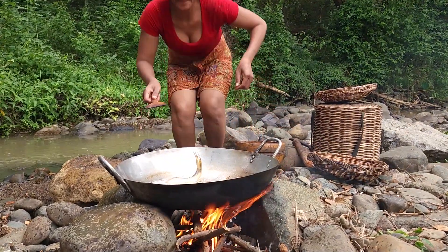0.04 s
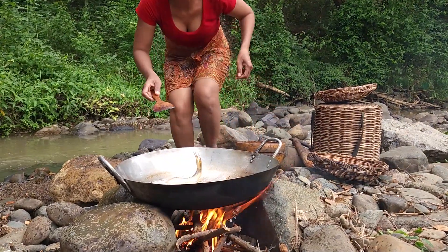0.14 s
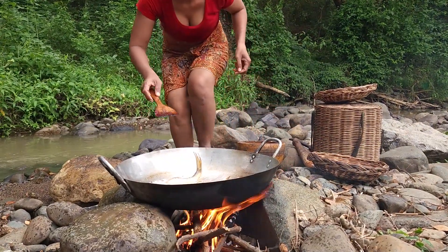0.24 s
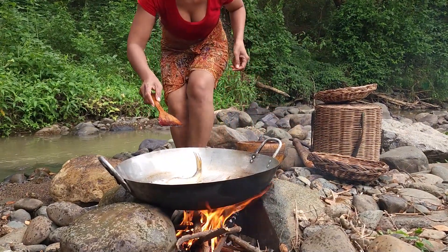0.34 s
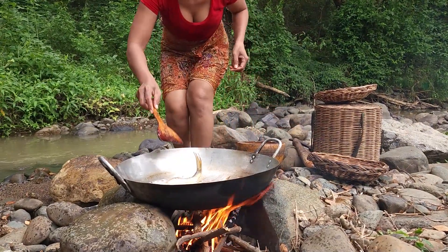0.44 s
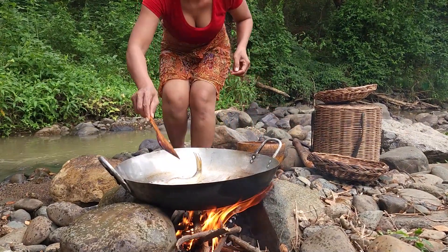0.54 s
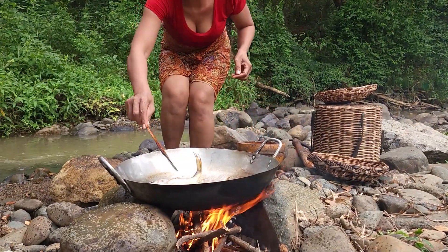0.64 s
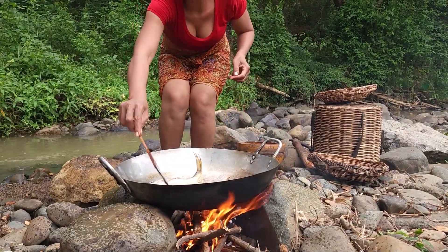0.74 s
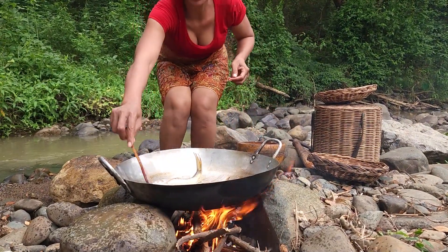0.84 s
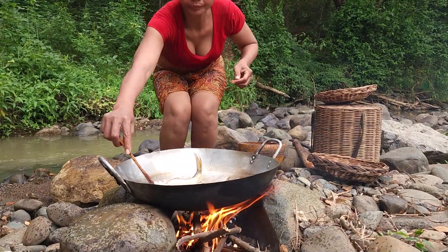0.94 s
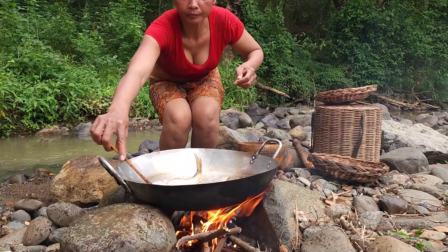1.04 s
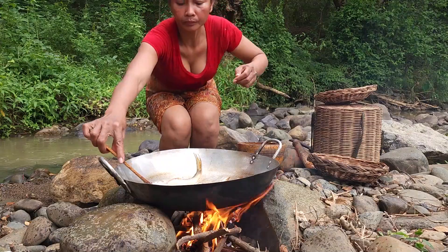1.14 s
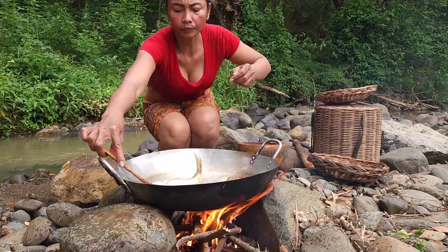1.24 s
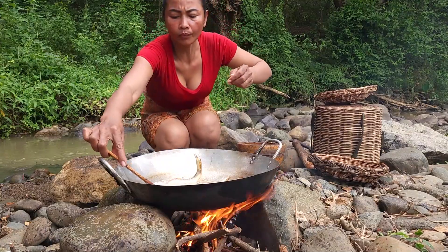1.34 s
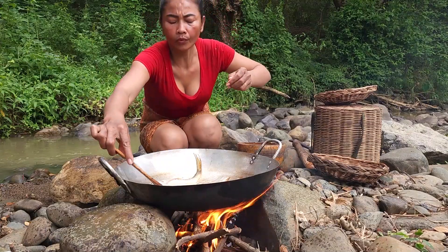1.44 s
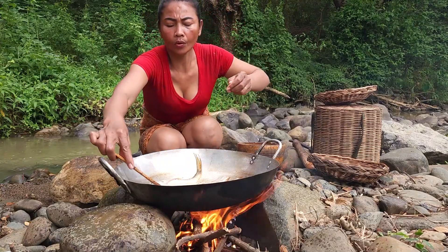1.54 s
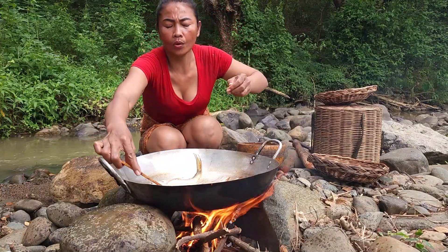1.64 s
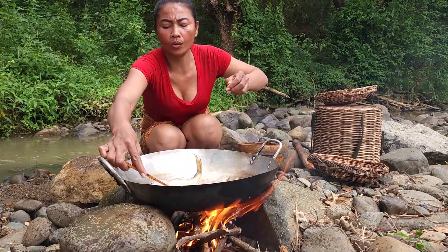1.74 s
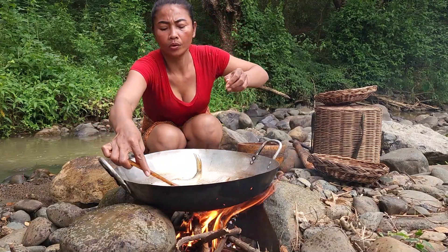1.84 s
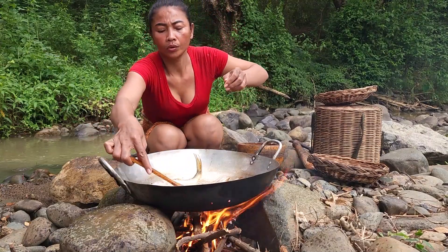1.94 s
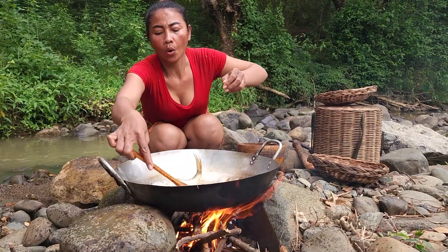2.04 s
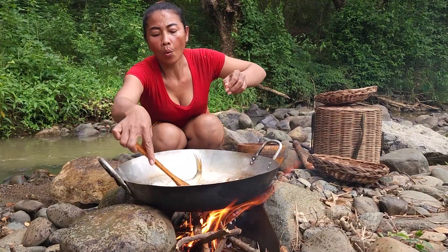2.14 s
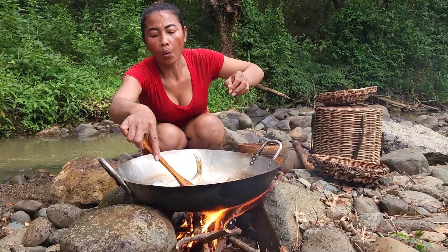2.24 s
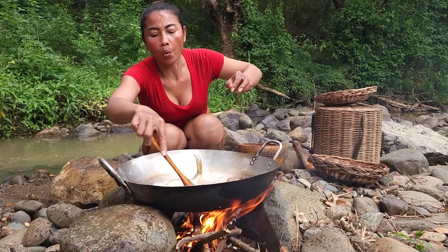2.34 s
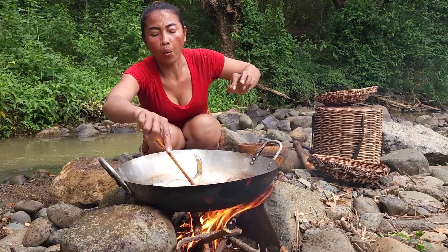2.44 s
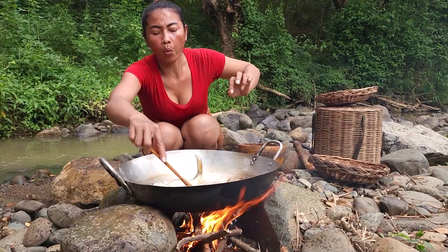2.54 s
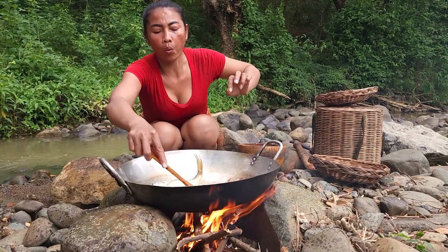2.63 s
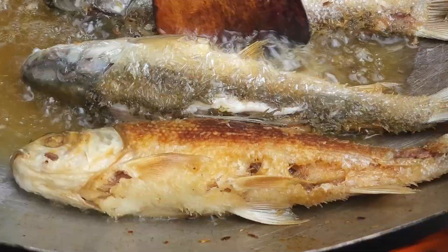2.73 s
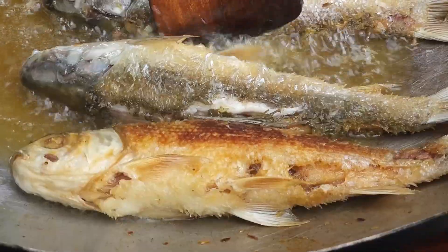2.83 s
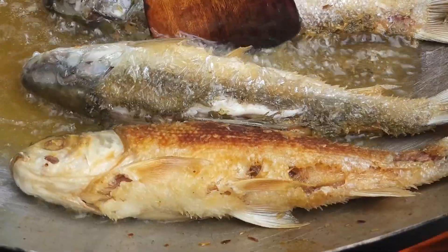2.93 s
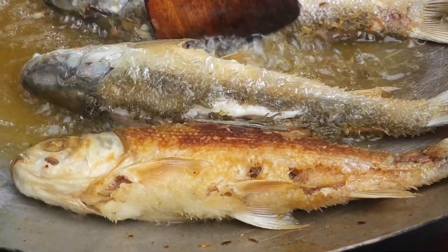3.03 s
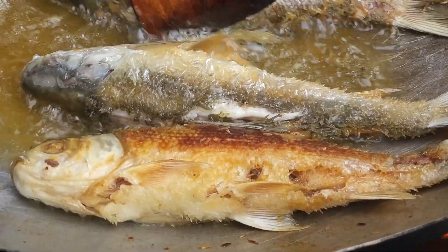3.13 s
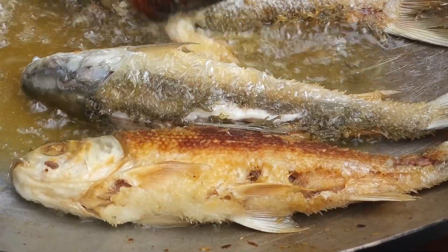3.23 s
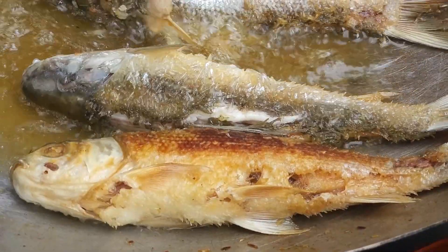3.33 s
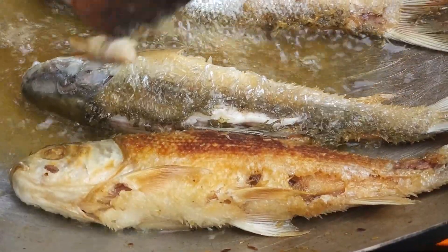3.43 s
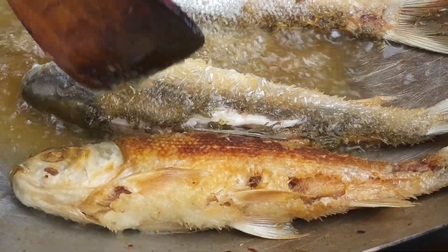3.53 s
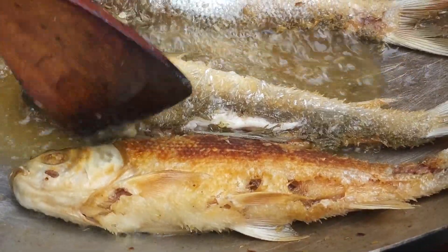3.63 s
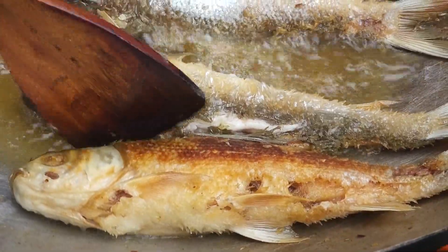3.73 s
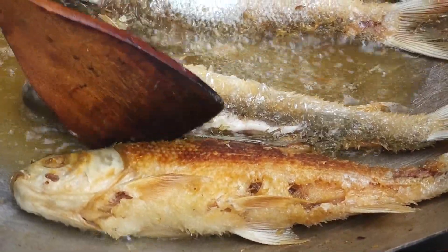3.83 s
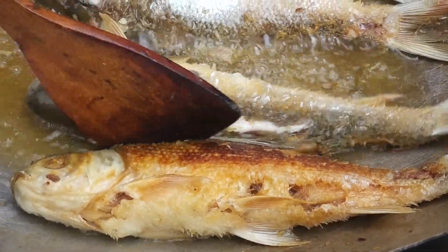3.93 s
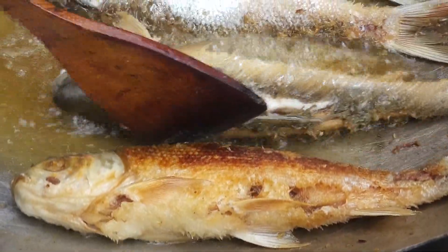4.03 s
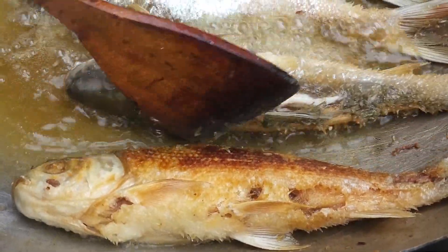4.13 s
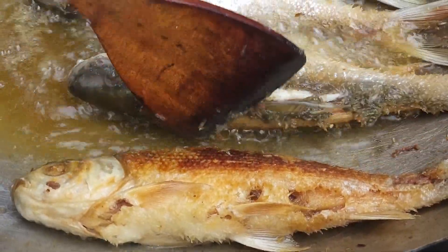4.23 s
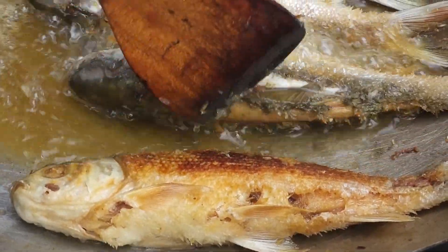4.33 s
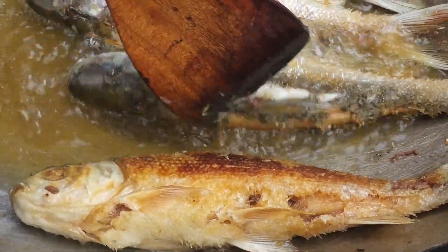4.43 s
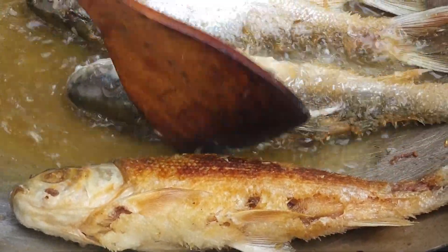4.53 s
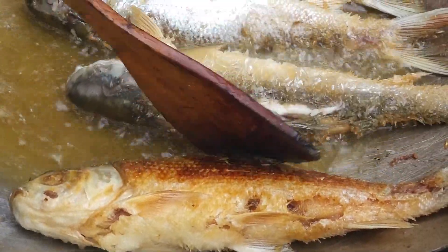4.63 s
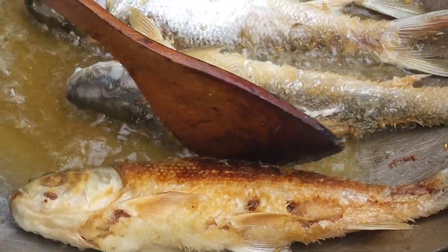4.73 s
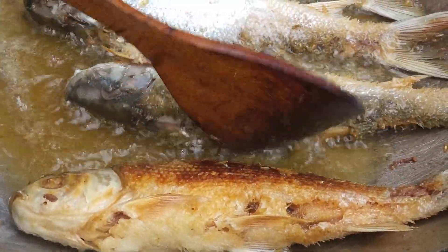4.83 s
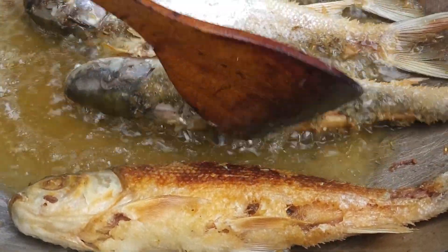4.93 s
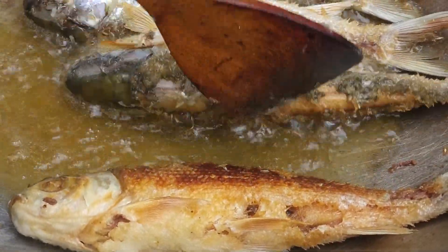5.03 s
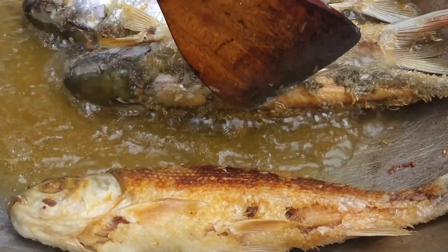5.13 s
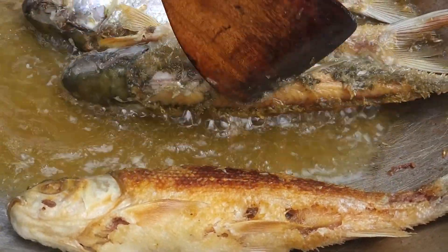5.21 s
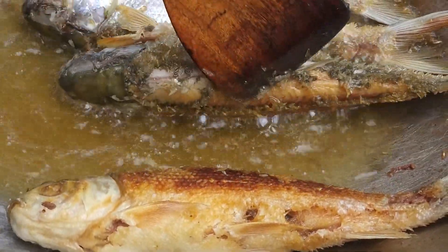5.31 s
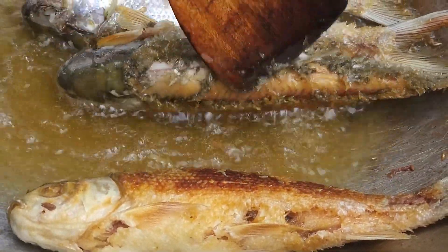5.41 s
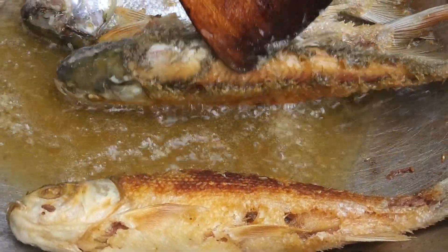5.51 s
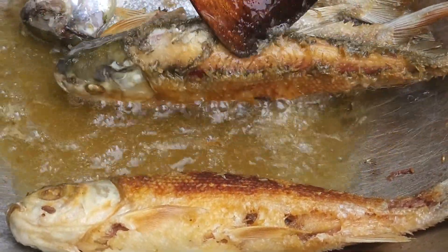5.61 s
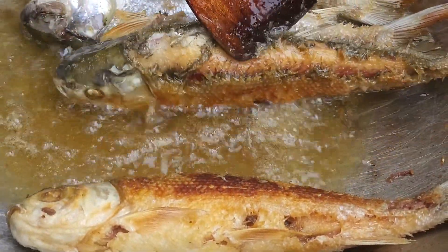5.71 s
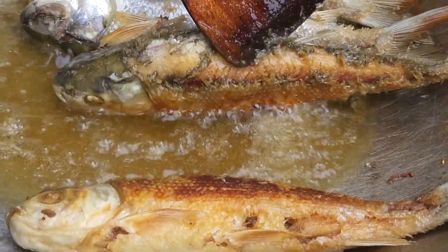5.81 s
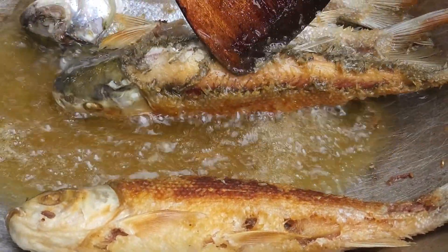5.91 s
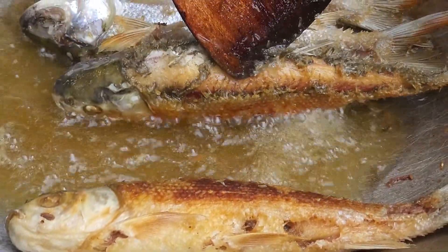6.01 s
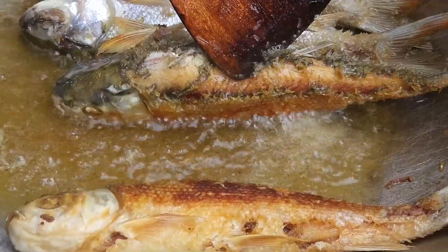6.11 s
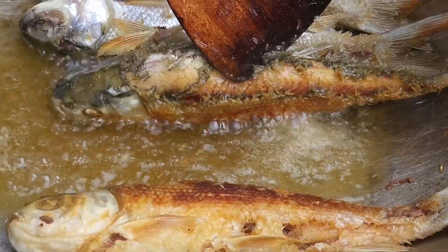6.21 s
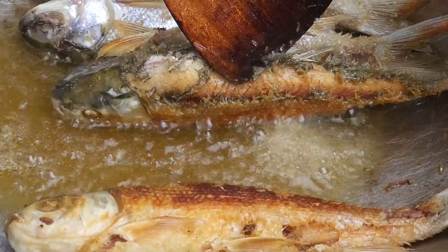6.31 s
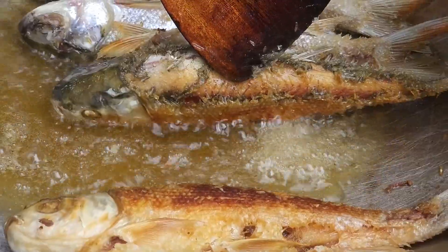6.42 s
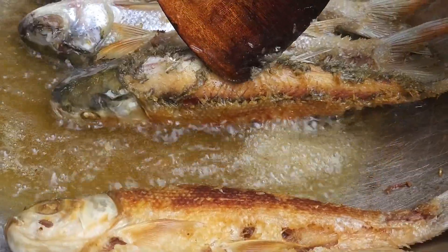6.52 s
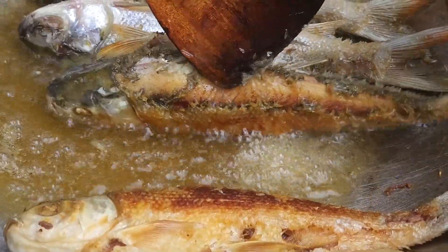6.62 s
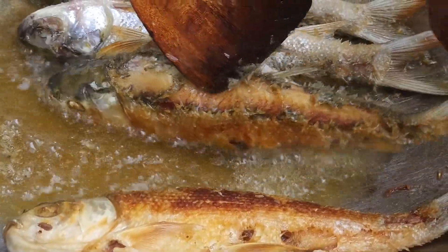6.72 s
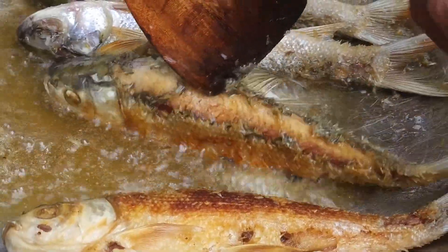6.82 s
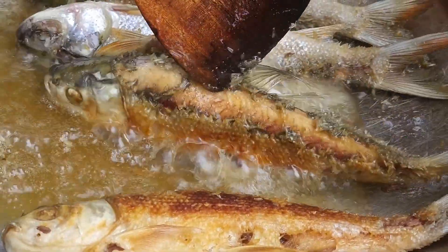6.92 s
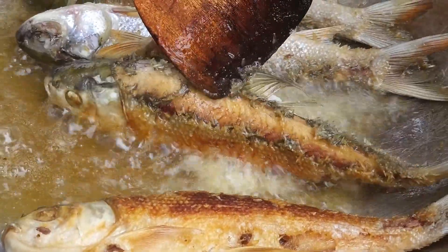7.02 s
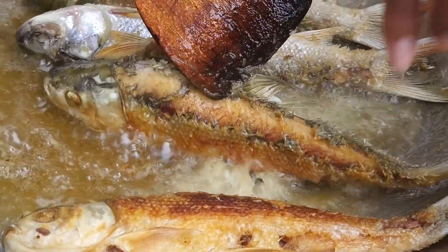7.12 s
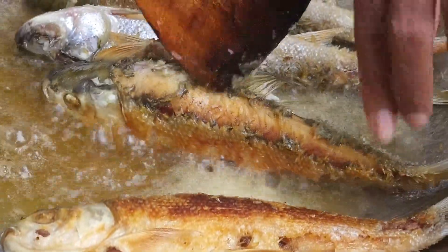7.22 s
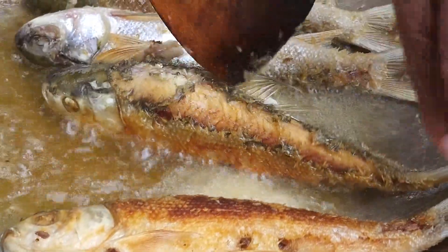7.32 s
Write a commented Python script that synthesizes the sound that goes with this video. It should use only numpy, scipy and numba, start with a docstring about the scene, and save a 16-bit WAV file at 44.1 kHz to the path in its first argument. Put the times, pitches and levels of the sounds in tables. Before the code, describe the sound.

Sparse crackles, one sharp wood crack and dull wok knocks from a few steps away cut abruptly to loud fish sizzling in hot oil.

```python
"""Fish fry in a steel wok over a wood fire outdoors, heard at two microphone ports.
Up to 2.812 s, from a few steps away: clumped steam bubbles, a low rustle and steady hiss as shaped noise.
From then on, from close above the oil: a dense fizz of bubble bursts, a hum of the wok and tiny snaps.
Throughout: spits as trails of damped sines, cracks of wood as noise splits with ringing splinters,
spatula knocks as damped steel modes, dull booms as sagging sines, and the fire's roar as fluttering noise."""
import sys
import numpy as np
from scipy.fft import rfft, irfft, next_fast_len
from scipy.io import wavfile
from scipy.ndimage import map_coordinates
from numba import njit

SR = 44100
rng = np.random.default_rng(int(sys.argv[2]) if len(sys.argv) > 2 else 0)


def int16_out(signal):
    """Quantize to a 16-bit WAV file."""
    q = np.round(np.clip(np.atleast_2d(signal).T, -1, 1) * 32767)
    wavfile.write(sys.argv[1], SR, q.astype(np.int16))


N = 324576
MOVE_S, MOVE_FADE_S = 2.812, 0.0057  # the listening point goes from far to close

# Fire roar spectrum. Each row: frequency in Hz, gain in dB.
ROAR_SPECTRUM = [(13, -39), (25, -15), (38, -4.5), (53, 8), (75, 1), (100, 4.5), (125, -2), (160, -2.5),
                 (200, -13.5), (300, -26), (400, -47), (660, -120)]
ROAR_FAR_DB, ROAR_NEAR_DB, ROAR_WAVERS_DB = -50, -58, 1

# Dull low booms. Each row: start in seconds, level in dB, settled pitch in Hz.
BOOM_EVENTS = [(0.15, -43, 54.6), (1.138, -44, 98), (1.778, -41, 52), (1.926, -41.5, 99.5),
               (2.138, -42.5, 99.7), (2.999, -42, 61), (3.58, -51, 56.4), (4.19, -45.5, 61.7),
               (4.94, -46, 59.6), (5.389, -43, 63), (5.57, -49, 40), (7.187, -42.5, 54), (7.332, -43, 61.5)]
BOOM_RISE_S, BOOM_T60_S = 0.0045, 0.45
BOOM_SAG, BOOM_SAG_S = 0.3, 0.017  # the pitch starts higher by this share and settles

# Spatula on the wok. Each row: start in seconds, blow in dB, brightness in dB, depth in dB.
KNOCK_EVENTS = [(.455, -37, 1, -14), (0.573, -57, 11, -14), (.674, -45, -1.5, -3), (0.911, -36, 1.5, -11),
                (1.046, -36, 1, -7.5), (1.074, -40, -22, -29), (1.237, -60.5, -9, 10.5),
                (1.356, -44.5, 0.5, -6), (1.428, -44.5, -14, -11), (1.548, -39.5, -22, -4),
                (1.745, -59, 9, -16), (1.778, -58, 6, -14), (1.984, -60, 3, -10), (2.136, -57.5, 12, -14),
                (2.338, -38.5, 1.5, -10), (2.475, -39, -3, -11), (2.904, -27.5, -30, -47),
                (3.046, -35, -4.5, -33), (4.624, -47.5, 3, -20), (4.721, -35, -28, -22),
                (5.459, -40, -8, -16), (6.715, -50, 13.5, -19)]
# Modes of the wok. Each row: frequency in Hz, level in dB, T60 in seconds.
WOK_MODES = [(274, 10.5, 0.031), (365, 0.5, 0.039), (452, -3, 0.036), (637, 4, 0.021), (792, -2, 0.028),
             (1100, -3.5, 0.04)]
SLIP_S, SLIP_DB, SLIP_FALL_DB = 0.063, -6.5, 11.5  # span of the blade's slips, level, loss over the span
CLOSE_SLIP_DB = -8  # deep in the oil the slips are damped

# Wood cracks and oil snaps. Each row: start in seconds, level in dB, left-right in dB, body in dB,
# middle in dB (body and middle against the top register).
CRACK_EVENTS = [(0.044, -24.5, -4, -25, 2), (0.0853, -23.5, 0, -18, 2), (.3646, -20, -2, -15, -7),
                (.394, -34, 0, 18, 3), (0.4465, -19.5, -5, 5, -2), (0.4576, -25, -4, 16, 13.5),
                (.4928, -26, -1, -4, 6), (.637, -31, -4, -2, 1), (.843, -27, -1, -5, 3),
                (0.932, -18.5, -1, 1.5, -5), (.9966, -17, -2, -8, 2), (1.069, -26.5, 1, 10, 8.5),
                (1.2386, -31, 3.5, -8, 4), (1.4297, 0.5, 2, 2, 3), (1.4914, -19.5, 9, 5, 4),
                (1.498, -6, -4, 1, 5), (1.5209, -26, 4, -6, -3), (1.5503, -8.5, -1, 2.5, 8.5),
                (1.561, -14.5, -1, 7, 6), (1.599, -20, 0, -13, 0), (1.6237, -18, 1, -19, -0.5),
                (2.3186, -19.5, -1, 1, -2), (2.4309, -15, 4, -8, -5), (2.6678, -9, 2, -27, -7),
                (3.1273, -11.5, -2.5, 3, 0), (3.1666, -17.5, -4, -3, 10), (3.376, -15, -8, -14, 4),
                (3.4087, -16.5, -7.5, -10, 2), (4.0305, -19, 2, -14, -4), (4.084, -22, -10, -11, 14.5),
                (4.3151, -19, -3, 11, -3), (4.381, -19, 8, -12, -10), (4.9733, -13.5, -7, -3, 11),
                (5.0719, -19, -8, -16, 8), (5.844, -12.5, -11, -15, 3), (5.949, -43, 6, 4, 7),
                (6.5318, -8, 0, -17, 2), (6.9584, -26, -9, 5, 12)]
# Crack spectrum. Each row: frequency in Hz, gain in dB.
CRACK_SPECTRUM = [(500, -15), (1400, -10.5), (2500, -12.5), (6000, -5.5), (12000, 0.5), (15000, -3.5),
                  (16500, -4)]
SPLIT_T60_S, SCATTER_T60_S, SCATTER_DB = 0.0059, 0.027, -13.5
CLOSE_SHORT = 0.79  # factor on both decays from close
FIBRE_DB = 5.5  # unevenness of the split
RING_DB, RING_T60_S = -16.5, 0.012  # splinters; T60 before CLOSE_SHORT
CRACK_SHARED = 0.18  # share of noise power alike at both ports
TICK_FAR_DB, TICK_NEAR_DB = -56.5, -42  # base level of the small ticks of spitting oil

# Boil from afar. Each row: time in seconds, level in dB.
FAR_BOIL_LEVEL = [(0, -50), (.18, -64), (.38, -89), (.55, -63), (1.32, -68), (1.55, -44.5), (1.88, -78),
                  (2.37, -63), (2.6, -55), (2.8, -51.5)]
# Low rustle. Each row: time in seconds, level in dB.
RUSTLE_LEVEL = [(0, -52.5), (.3, -54.5), (.375, -54), (.395, -43), (.41, -46), (.45, -37), (.47, -47.5),
                (.51, -53), (1.08, -53.5), (1.63, -57.5), (1.78, -62), (2.0, -50), (2.2, -52), (2.33, -45),
                (2.55, -55), (2.8, -53)]
# Oil spectrum from afar. Each row: frequency in Hz, gain in dB.
FAR_OIL_SPECTRUM = [(120, -78), (200, -4.5), (353, -13.5), (393, -11), (1160, -12), (1340, -17),
                    (2040, -9.5), (2230, -13.5), (3220, -9.5), (4240, -2.5), (5090, -12.5), (6450, -7.5),
                    (9640, -16.5), (11800, -13.5), (15800, -19)]
# Spectrum of the stream's hiss. Each row: frequency in Hz, gain in dB.
STREAM_SPECTRUM = [(120, -36), (200, -4), (547, -18), (1160, -10), (1360, -14.5), (1640, -5.5), (2730, -10),
                   (4240, -7.5), (4990, -9.5), (9820, -15.5), (15800, -4)]

# Boil from close. Each row: time in seconds, level in dB, left-right in dB.
NEAR_BOIL_LEVEL = [(2.83, -43, -7.5), (3.06, -39.5, -3.5), (3.36, -38.5, -8.5), (3.46, -41, -9.5),
                   (3.8, -38, -5), (4.0, -39.5, -5), (4.39, -39, -3), (4.61, -42.5, -3), (5.0, -39.5, -4.5),
                   (5.37, -36, -4), (5.76, -36.5, -1), (5.91, -33.5, -2.5), (6.25, -34.5, -2),
                   (6.4, -32, 0.5), (6.6, -32, -1.5), (6.74, -34, -1.5), (6.9, -35, -6), (7.0, -32.5, -9),
                   (7.08, -32.5, -8.5), (7.17, -35, -7), (7.36, -34, -5)]
# Big bubbles against the fizz. Each row: time in seconds, level in dB.
BIG_LEVEL = [(2.83, 2), (3.3, -1.5), (3.75, 2.5), (4.1, -1), (4.55, 1.5), (5.0, 0.5), (5.35, -2.5),
             (5.7, 4.5), (6.0, 0.5), (6.3, 0), (6.58, -2.5), (6.85, 4.5), (7.36, 1)]
# Oil spectrum from close. Each row: frequency in Hz, gain in dB.
NEAR_OIL_SPECTRUM = [(650, -20), (1100, -11.5), (1420, -4), (1900, -9.5), (2080, -3.5), (2570, -7.5),
                     (3030, 0), (4150, 1.5), (5480, 0.5), (6850, -2), (7490, -1.5), (9150, -10),
                     (11800, -3.5), (15800, -9)]
# Spectrum of the wok's hum. Each row: frequency in Hz, gain in dB.
SIMMER_SPECTRUM = [(110, -43), (180, -25), (281, -11.5), (319, -22), (404, 12), (467, -1), (574, 4.5),
                   (728, -14.5), (833, 11.5), (1200, -34), (1560, -48), (2640, -120)]
BIG_WAVERS_DB, SPRAY_DB, SPRAY_WAVERS_DB = 1.0, -4, 1.2  # spray level is against the fizz
SIMMER_DB, SIMMER_DB_PER_BOIL_DB = -41, 0.66

# Tiny bubbles snapping close by. Each row: start in seconds, level in dB, pitch in Hz, left-right in dB.
SNAP_EVENTS = [(2.9986, -21, 4890, -8), (3.1148, -16, 7200, -6.0), (3.2894, -28, 5360, -11.5),
               (3.3337, -17, 6000, -15), (3.3634, -30, 4910, -9.5), (3.3757, -20, 4870, -13.0),
               (3.3874, -24, 7430, -11), (3.4087, -15, 5700, -15), (3.4994, -34, 5040, -10.5),
               (3.5468, -19.5, 6230, -13), (3.7419, -22, 4610, -7.0), (3.8377, -16.5, 6400, -17),
               (4.998, -32, 4620, -7.0), (5.0274, -16, 5570, -16), (5.0498, -19, 6490, -8.0),
               (5.0574, -22, 5800, -11), (5.0654, -15, 6250, -12), (5.2172, -14, 5440, -13),
               (5.254, -14, 5520, -13), (5.278, -16, 5630, -11), (5.358, -14.5, 6740, -16),
               (5.779, -14.5, 5800, -14), (6.3071, -15, 5260, -2.5)]
SNAP_LIFE_S, SNAP_OCTAVE_DB, SNAP_COUNT = 0.00038, -10, 260  # decay time, overtone, random extras
SNAP_LATE_S = 0.0008  # the neck of the bubble closes before it rings

# Bubbles spitting oil. Each row: start in seconds, level in dB, pitch in Hz, left-right in dB.
SPIT_EVENTS = [(.1345, -28.5, 2830, -5), (.1608, -23, 4220, -6), (.1705, -21, 4290, 1),
               (.2932, -33, 5700, -2), (.394, -38, 4630, -.5), (.422, -32, 3500, 1), (.4565, -26, 690, 3),
               (.4575, -28, 3300, -2), (.5367, -29, 4970, -3), (.6752, -23.5, 4240, -1),
               (.7307, -29.5, 5400, -4), (.7622, -30, 4500, -6), (.8026, -31.5, 4210, -1),
               (.8714, -25.5, 3760, -3), (.9739, -21, 2675, -3), (.985, -27.5, 4330, -4),
               (1.0487, -24, 3550, -3), (1.133, -25.5, 4000, -4), (1.1867, -26.5, 2240, -2),
               (1.2177, -31, 4740, -7), (1.3246, -23, 4260, -2), (1.422, -24, 3100, 4),
               (1.4295, -22, 1510, -1), (1.475, -27, 4330, 1), (1.4984, -22, 2480, -4),
               (1.531, -26, 4330, 3), (1.5489, -21, 2400, -2), (1.6663, -29, 3260, -4),
               (1.705, -32.5, 4050, 3), (1.7444, -37, 4100, 2), (1.7944, -32, 4150, -4),
               (1.8357, -36, 1800, -5), (1.9152, -38, 4050, 3), (1.9463, -26.5, 3130, -8),
               (2.0153, -30, 3770, 5), (2.156, -23.5, 3300, -3), (2.2066, -28, 3920, 3),
               (2.2262, -30, 3460, 5), (2.2585, -23.5, 4230, -2), (2.2864, -32, 1910, -4),
               (2.321, -24, 3050, 3), (2.3422, -26.5, 3020, -8), (2.402, -20, 4160, -1),
               (2.471, -29, 3300, -4), (2.566, -26.5, 4430, 2), (2.655, -27.5, 3930, -1),
               (2.7554, -22.5, 3800, 5), (2.807, -27.5, 4010, 10), (2.821, -27, 2350, -2),
               (3.1035, -20, 3100, 0), (3.2087, -26.5, 2130, 0), (3.26, -24.5, 1920, -1),
               (3.2944, -23, 1800, -2), (3.3422, -24, 1730, -1), (3.3578, -31, 4860, -10),
               (3.5717, -25, 1700, 0), (3.6236, -23, 1660, -1), (3.6433, -24, 1370, 0),
               (3.6815, -38, 1670, -4), (3.755, -26, 2650, 5), (3.8433, -25, 2000, 1),
               (3.8765, -26.5, 1170, 0), (3.9399, -31, 1320, 1.5), (4.0833, -24.5, 4050, -6),
               (4.145, -27.5, 1640, 3), (4.3166, -31, 2280, 4), (4.567, -29, 1570, 4),
               (4.571, -27, 3960, -7), (4.68, -38, 1310, 1), (4.874, -35.5, 890, -1),
               (4.8925, -27, 2770, -1), (4.9484, -26, 3000, -2), (5.4642, -24, 1630, -1),
               (5.4896, -26.5, 2100, 1), (5.5897, -18.5, 1910, 0), (5.685, -30, 1480, 0),
               (5.7318, -22, 1840, 2), (5.7786, -19.5, 2500, 2), (5.949, -28, 3900, 13),
               (5.9918, -21, 3120, 1), (6.1789, -16.5, 3040, -4), (6.3909, -23.5, 2220, 4),
               (6.8334, -26, 2200, 0), (7.2285, -23.5, 1580, -1), (7.2845, -27, 2080, -2),
               [0.0632, -45, 2410, 0], [0.1273, -35, 3930, -5], [0.183, -45, 1570, -6],
               [0.2764, -33.5, 6500, -3], [0.3429, -35, 5870, -1], [0.4991, -38, 3640, 3],
               [0.5772, -37, 1610, -3], [0.6028, -32, 6550, -2], [0.7406, -30, 4750, 7],
               [0.8568, -35, 6270, -3], [0.8874, -33, 5630, 0], [0.9108, -34, 2370, -6],
               [1.0272, -39, 2040, -2], [1.2507, -40, 5470, -3], [1.3413, -43, 3660, 2],
               [1.4436, -39, 2910, -2], [1.6147, -35, 3200, -5], [1.8495, -38, 6400, -1],
               [1.8743, -38, 2580, -5], [1.8884, -35, 3340, -1], [1.9271, -30, 4270, 2],
               [1.9869, -38, 1130, -2], [2.0279, -33, 3560, -4], [2.0775, -43, 1890, -5],
               [2.0998, -38, 4800, -4], [2.1389, -30, 2140, -1], [2.1661, -25, 3700, -1],
               [2.1892, -37, 3350, 2], [2.3824, -31, 2020, -1], [2.5433, -28, 3500, -2],
               [2.5922, -32, 3770, -2], [2.7305, -39, 2010, -2], [2.871, -29, 2690, 1],
               [2.894, -29, 2690, -3], [2.9678, -28, 3050, -5], [3.0075, -35, 2120, 1],
               [3.0409, -30, 2100, -1], [3.0545, -49, 1360, -1], [3.0904, -37, 1650, -3],
               [3.1616, -31, 1260, 0], [3.4419, -32, 3080, 0], [3.7333, -29.5, 1300, 0],
               [4.2504, -37.5, 1240, 3], [4.3163, -28, 3490, -3], [4.4938, -32, 2170, 4],
               [4.5455, -31, 2120, 2], [4.6912, -29.5, 1360, 2], [4.7332, -27, 3620, -2],
               [4.8132, -33.5, 1330, 0], [4.9037, -27, 3700, 3], [5.0838, -34, 3290, 2],
               [5.1168, -35, 2170, 4], [5.6198, -26, 2320, 1], [5.6349, -32, 1500, 2],
               [5.6997, -26.5, 1810, 3], [5.7502, -29, 1820, -1], [5.9497, -22.5, 2380, 6],
               [6.17, -28, 2300, 3], [6.2382, -27.5, 1790, 4], [6.3267, -22, 2430, 2],
               [6.4082, -23, 2410, -6], [6.5174, -26, 3240, 1], [6.7215, -25, 2630, 6],
               [6.7387, -27, 2020, 1], [6.8035, -21.5, 3040, 2], [7.3228, -29.5, 2390, 5]]
SMALL_FAR_DB, SMALL_NEAR_DB, SMALL_MEDIAN_HZ = -50, -37.5, 3417  # lesser spits; base levels
# At 3 kHz; lower bubbles leave shorter, wider, drier trails.
SPIT_LIFE_S, TRAIL_S, TRAIL_SPREAD = 0.001, 0.009, 0.3  # decay time, trail length, pitch scatter
TRAIL_FALL_DB, TRAIL_PEAK = 17, 0.11  # loss per trail length; loudest at this share of it
POP_DB, POP_SHORT = -1, 0.33  # click of the first bubble's skin: level offset, factor on decay time

# Left-right likeness of noise. Each row: frequency in Hz, likeness from 0 to 1.
LIKENESS = [(40, .988), (80, .965), (170, .85), (350, .72), (700, .7), (1410, .62), (2500, .4), (4000, .12),
            (6800, .02)]
# Port colour. Each row: frequency in Hz, left-right in dB.
PORT_COLOUR = [(250, -1), (380, 2.5), (700, 2), (1290, 2), (2380, 2), (3200, 7), (4400, -2), (8120, 0.5),
               (15000, 3)]
# Port phase. Each row: frequency in Hz, lead of the left port in radians.
PORT_LEAD = [(300, 0), (900, 0.6), (1460, 1), (2300, 1), (3200, 1), (4500, 0)]
ROLL_HZ, TOP_HZ = 15880, 16900


def amp(db):
    """dB to gain."""
    return 10 ** (np.asarray(db) / 20)


def unit(x):
    """Scale to rms 1."""
    return x / np.sqrt(np.mean(x ** 2) + 1e-20)


def sides(pan_db):
    """Left and right gain for a left-right level difference."""
    return amp(np.array([pan_db / 2, -pan_db / 2]))


def curves(rows):
    """One value per sample for each column after the time."""
    time_s, *columns = np.transpose(rows)
    return [np.interp(np.arange(N) / SR, time_s, column) for column in columns]


def wobble(rate_hz):
    """Smooth random curve with rate_hz knots a second."""
    knots = rng.standard_normal(int(N * rate_hz / SR) + 4)
    return map_coordinates(knots, [np.arange(N) * rate_hz / SR])


def filtered(x, gain):
    """Multiply the spectrum of x by a gain of frequency."""
    m = next_fast_len(N + 8192)
    return irfft(rfft(x, m) * gain(np.fft.rfftfreq(m, 1 / SR)), m)[..., :N]


def shape(points):
    """Gain curve through (Hz, dB) points on a log axis."""
    f, db = np.transpose(points)
    return lambda hz: amp(np.interp(np.log(hz + 1), np.log(f + 1), db))


@njit
def bursts(n, start, step, life, size, lag, soft):
    """Damped sines with soft onsets; the right port hears each one lag samples after the left."""
    out = np.zeros((2, n))
    for g in range(len(start)):
        for c in range(2):
            for i in range(int(4 * life[g]) + 16):
                u = i - 8 + (0.5 - c) * lag[g]
                k = start[g] + i - 8
                if u > 0 and 0 <= k < n:
                    v = u / life[g]
                    out[c, k] += size[g, c] * np.sin(step[g] * u) * np.exp(-v) * (1 - np.exp(-v / soft))
    return out


def bubbles(count, cycles, spread_db, clump, slow, lag_s, pan_db):
    """Carpet of bubble bursts of rms 1, in clumps, from all over the pan; lag and pan are spreads."""
    crowd = np.cumsum(np.exp(clump * (wobble(120) + slow * wobble(25))))
    u, g = rng.random((count, 3)), rng.standard_normal((count, 3))
    start = np.searchsorted(crowd, u[:, 0] * crowd[-1])
    hz = 150 * (17000 / 150) ** np.sqrt(u[:, 1])
    # small bubbles are many: equal power per Hz
    share = np.sqrt(np.log(17000 / 150) / np.log(hz / 149))
    size = hz * share * amp(-spread_db * np.log(1.004 - u[:, 2]))
    size = size[:, None] * sides(pan_db * g[:, 1]).T
    life = cycles * np.exp(0.41 * np.clip(g[:, 0], -2, 2)) * SR / hz
    return unit(bursts(N, start, 2 * np.pi * hz / SR, life, size, g[:, 2] * lag_s * SR, 0.55))


def hiss():
    """White noise, alike at both ports in the bass, nearly unrelated in the treble."""
    f, alike = np.transpose(LIKENESS)

    def mid_side(hz):
        likeness = np.interp(np.log(hz + 1), np.log(f), alike)
        turn = np.arccos(np.clip(likeness, 0, 1)) / 2
        return np.array([np.cos(turn), np.sin(turn)])

    mid, side = filtered(rng.standard_normal((2, N)), mid_side)
    return unit(np.array([mid + side, mid - side]))


def flames(close):
    """The fire's low, fluttering roar as shaped noise; weaker over the oil."""
    level_db = ROAR_FAR_DB + (ROAR_NEAR_DB - ROAR_FAR_DB) * close + ROAR_WAVERS_DB * wobble(11)
    flutter = amp(1.8 * wobble(12))
    return amp(level_db) * unit(flutter * filtered(hiss(), shape(ROAR_SPECTRUM)))


def stream():
    """Steady hiss of the stream as shaped noise."""
    return unit(filtered(hiss(), shape(STREAM_SPECTRUM))) * amp(-55.5)


def booms():
    """Sines that swell fast, sag in pitch and die away."""
    out, t = np.zeros(N + SR), np.arange(SR // 2) / SR
    for start_s, db, hz in BOOM_EVENTS:
        pitch_hz = hz * (1 + BOOM_SAG * np.exp(-t / BOOM_SAG_S))
        phase = 2 * np.pi * np.cumsum(pitch_hz) / SR
        env = amp(db - 60 * t / BOOM_T60_S) * (1 - np.exp(-t / BOOM_RISE_S))
        out[round(start_s * SR):][:len(t)] += env * np.sin(phase)
    return out[:N]


def wok_ring(t, bright_db, low_db):
    """Damped modes of the wok, detuned and scattered in level at each strike."""
    ring = 0
    for hz, mode_db, t60_s in WOK_MODES:
        level_db = mode_db + (hz > 600) * bright_db + (hz < 300) * low_db + rng.normal(0, 3.0)
        phase = 2 * np.pi * hz * rng.normal(1, 0.031) * t + 0.35 * rng.standard_normal((2, 1))
        ring = ring + amp(level_db - 60 * t / t60_s) * np.sin(phase)
    return ring


def knocks():
    """Wood on oil-damped steel: brightness sets the upper modes, depth the lowest; then the blade slips."""
    out, t = np.zeros((2, N + SR)), np.arange(SR // 8) / SR
    attack = 1 - np.exp(-t / .002)
    for start_s, db, bright_db, low_db in KNOCK_EVENTS:
        strikes = [(0.0014, 0)]
        for u in rng.random(size=6):
            strikes.append((u * SLIP_S, SLIP_DB - SLIP_FALL_DB * u + CLOSE_SLIP_DB * (start_s > MOVE_S)))
        for late_s, offset_db in strikes:
            ring = wok_ring(t, bright_db, low_db)
            out[:, round((start_s + late_s) * SR):][:, :len(t)] += amp(db + offset_db) * ring * attack
    return out[:, :N] * sides(0.51)[:, None]


def ticks():
    """Small ticks of spitting oil: random rows like the cracks, mostly much weaker."""
    u, g = rng.random((330, 2)), rng.standard_normal((330, 3))
    start_s = u[:, 0] * N / SR
    far = start_s < MOVE_S
    db = np.where(far, TICK_FAR_DB, TICK_NEAR_DB) - 2.0 * np.log(1.02 - u[:, 1])
    body_db = np.where(far, 9, 2) + 5 * g[:, 1]
    return np.transpose([start_s, db, -2 + 4 * g[:, 0], body_db, 8 + 4 * g[:, 2]])


def cracks():
    """A brief split of fibres, a scatter off the stones and ringing splinters, in three registers."""
    out, t = np.zeros((3, 2, N + SR)), np.arange(1200) / SR
    for start_s, db, pan_db, body_db, middle_db in np.vstack([CRACK_EVENTS, ticks()]):
        v = t / (CLOSE_SHORT if start_s > MOVE_S else 1)
        decay = amp(-60 * v / SPLIT_T60_S) + amp(SCATTER_DB - 60 * v / SCATTER_T60_S)
        env = (1 - np.exp(-(t / .00045) ** 2)) * decay
        levels = amp([db, db + middle_db, db + body_db])[:, None, None] * sides(pan_db)[:, None]
        own, shared = rng.standard_normal((3, 2, len(t))), rng.standard_normal((3, 1, len(t)))
        noise = np.sqrt(1 - CRACK_SHARED) * own + np.sqrt(CRACK_SHARED) * shared
        # some fibres break louder
        fibres = amp(FIBRE_DB * rng.standard_normal(len(t) // 8)).repeat(8)
        split = env * noise * fibres
        split = split * np.linalg.norm(env) / np.linalg.norm(split, axis=2).mean(1)[:, None, None]
        hz = 1000 * np.exp(rng.uniform(0.312, 2.4, (3, 1, 4, 1)))
        ring_env = amp(RING_DB - 60 * v / RING_T60_S) * (1 - np.exp(-t / .0006))
        ring = ring_env * np.sin(2 * np.pi * hz * t).sum(2)
        out[..., round(start_s * SR):][..., :len(t)] += levels * (split + ring)

    def under(hz, edge_hz):
        return 1 / (1 + (hz / edge_hz) ** 6)

    def registers(hz):
        top, middle = 1 - under(hz, 10650), under(hz, 7540) - under(hz, 3300)
        return shape(CRACK_SPECTRUM)(hz) * np.array([top, middle, under(hz, 3200)])[:, None]

    return filtered(out[..., :N], registers).sum(0)


def far_oil():
    """From afar: clumps of bubbles with weak ticks between, and a low rustle of fluttering noise."""
    (boil_db,), (rustle_db,) = curves(FAR_BOIL_LEVEL), curves(RUSTLE_LEVEL)

    def low(hz):
        return 1 / (1 + (hz / 1900) ** 0.72)

    def upper_oil(hz):
        return shape(FAR_OIL_SPECTRUM)(hz) * (1 - low(hz))

    foam = bubbles(count=24000, cycles=1.7, spread_db=0.0, clump=0.93, slow=.15, lag_s=.0001, pan_db=10.0)
    foam = unit(filtered(foam, upper_oil))
    rustle = hiss() * amp(4.54 * wobble(60.5))
    rustle = unit(filtered(rustle, lambda hz: shape(FAR_OIL_SPECTRUM)(hz) * low(hz)))
    trickle = bubbles(count=2600, cycles=3.5, spread_db=4.0, clump=.8, slow=.3, lag_s=.0001, pan_db=5.5)
    trickle = unit(filtered(trickle, upper_oil))
    return foam * amp(boil_db) + trickle * amp(-59.5) + rustle * amp(rustle_db)


def near_foam():
    """Dense short bubbles and noise, some longer-ringing bubbles, and a sparse sharp crackle."""
    dense = bubbles(count=90000, cycles=1.67, spread_db=1.0, clump=.36, slow=.15, lag_s=.00006, pan_db=-1.0)
    ringing = bubbles(count=9000, cycles=21.6, spread_db=1.3, clump=.3, slow=.3, lag_s=.00008, pan_db=0.5)
    crackle = bubbles(count=6000, cycles=2.35, spread_db=3.0, clump=.7, slow=.1, lag_s=.00008, pan_db=3.5)
    return dense + amp(-4) * hiss() + amp(-6.5) * ringing + amp(-3.5) * crackle


def near_oil():
    """From close: a fizz whose big bubbles and fine spray waver by band, and the wok's hum underneath."""
    boil_db, pan_db = curves(NEAR_BOIL_LEVEL)
    big_db = curves(BIG_LEVEL)[0] + BIG_WAVERS_DB * wobble(14)
    spray_db = SPRAY_DB + SPRAY_WAVERS_DB * wobble(20)
    foam = near_foam()
    fizz = unit(filtered(foam, shape(NEAR_OIL_SPECTRUM)))
    big = filtered(fizz, lambda hz: 1 / (1 + (hz / 2700) ** 16))
    spray = filtered(fizz, lambda hz: 1 - 1 / (1 + (hz / 8600) ** 12))
    body = fizz - big - spray
    simmer = unit(filtered(foam, shape(SIMMER_SPECTRUM)))
    simmer = simmer * amp(SIMMER_DB_PER_BOIL_DB * boil_db + SIMMER_DB)
    panned = (body + spray * amp(spray_db)) * sides(pan_db)
    return simmer + amp(boil_db) * (panned + big * amp(big_db))


def snaps():
    """Tiny bubbles ring for a few cycles with their octave; lesser ones come at random once close."""
    u, g = rng.random((SNAP_COUNT, 2)), rng.standard_normal((SNAP_COUNT, 2))
    lesser_s = MOVE_S + u[:, 0] * (N / SR - MOVE_S)
    lesser_db = -33 - 0.62 * np.log(1.02 - u[:, 1])
    lesser = np.transpose([lesser_s, lesser_db, 5600 * np.exp(0.2 * g[:, 0]), -6 + 4 * g[:, 1]])
    start_s, db, hz, pan_db = np.vstack([SNAP_EVENTS, lesser]).T
    start = ((start_s + SNAP_LATE_S) * SR).astype(np.int64)
    life = np.full(len(start), SNAP_LIFE_S * SR)
    lag = rng.normal(0, 2.8, len(start))  # samples
    size, step = amp(db)[:, None] * sides(pan_db).T, 2 * np.pi * hz / SR
    octave = bursts(N, start, 2 * step, life, size * amp(SNAP_OCTAVE_DB), lag, 1.0)
    return bursts(N, start, step, life, size, lag, 1.0) + octave


def pops(table, count):
    """Each pop is a first bubble with a click and a trail of others scattered around its pitch."""
    start_s, db, hz, pan_db = np.repeat(np.transpose(table), count, axis=1)
    g = rng.standard_normal((len(start_s), 5))
    order = np.tile(np.arange(count), len(table)) / count
    first = order == 0
    height = hz / 3000
    late_s = order * np.abs(1 + .5 * g[:, 0]) * TRAIL_S * height ** .4
    scatter = TRAIL_SPREAD * height ** -.8 * (order + 0.11) * g[:, 1]
    pitch_hz = np.minimum(hz * np.exp(scatter), SR / 2.5)
    trail_db = -TRAIL_FALL_DB * np.abs(order - TRAIL_PEAK) + POP_DB * first
    size = amp(db + trail_db - 0.6 + 1.35 * g[:, 2])[:, None] * sides(pan_db).T
    stretch = np.where(first, POP_SHORT, np.exp(0.5 * np.clip(g[:, 4], -2, 1)))
    life = SPIT_LIFE_S * height ** 0.13 * SR * stretch
    start = ((start_s + late_s) * SR).astype(np.int64)
    return bursts(N, start, 2 * np.pi * pitch_hz / SR, life, size, g[:, 3] * .0001 * SR, 0.83)


def spits():
    """Loud bubble bursts at the fish skin, and many lesser ones at random."""
    u, g = rng.random((300, 2)), rng.standard_normal((300, 2))
    start_s = u[:, 0] * N / SR
    db = np.where(start_s < MOVE_S, SMALL_FAR_DB, SMALL_NEAR_DB) - 3.1 * np.log(1.02 - u[:, 1])
    lesser = np.transpose([start_s, db, SMALL_MEDIAN_HZ * np.exp(.25 * g[:, 0]), 5 * g[:, 1]])
    return pops(np.vstack([SPIT_EVENTS, lesser]), count=16)


def scene():
    """Sum of all sources; far oil and stream give way to near oil within a few ms."""
    close = np.clip((np.arange(N) / SR - MOVE_S) / MOVE_FADE_S, 0, 1)
    background = flames(close) + booms() + knocks() + cracks()
    oil = (stream() + far_oil()) * (1 - close) + near_oil() * close
    return background + oil + snaps() + spits()


def record(dry):
    """The two ports differ in colour and phase; the top falls away, and nothing passes the band limit."""
    f, lead = np.transpose(PORT_LEAD)

    def left(hz):
        apart = np.clip(hz / 250, 0, 1) ** 2 / 2  # long waves reach both ports alike
        lead_rad = np.interp(np.log(hz + 1), np.log(f), lead)
        return shape(PORT_COLOUR)(hz) ** apart * np.exp(.5j * lead_rad)

    def top(hz):
        return amp(-30 * np.clip((hz - ROLL_HZ) / 250 + .5, 0, 1)) * (hz < TOP_HZ)

    return filtered(dry, lambda hz: np.array([left(hz), 1 / left(hz)]) * top(hz))


dry = scene()
out = record(dry)
int16_out(out)
```